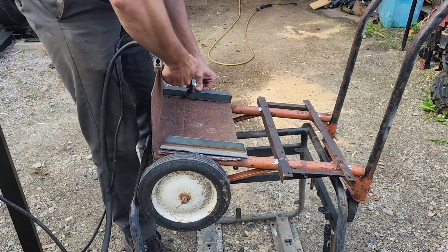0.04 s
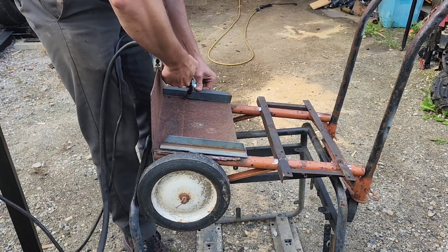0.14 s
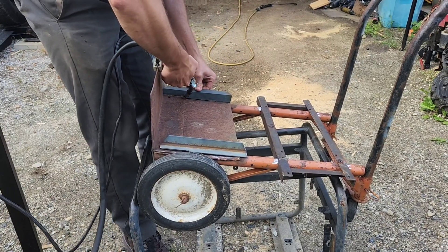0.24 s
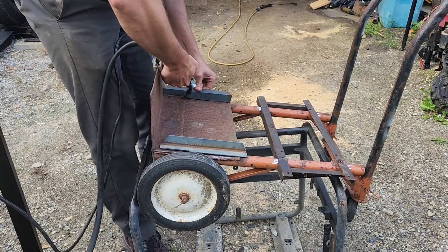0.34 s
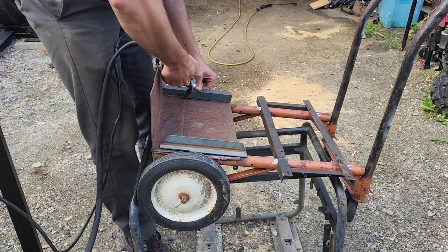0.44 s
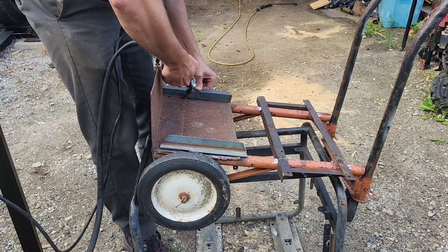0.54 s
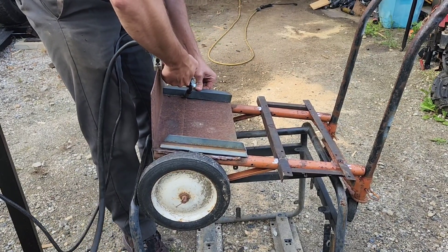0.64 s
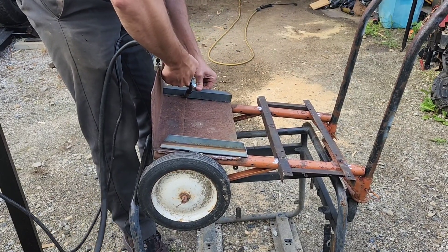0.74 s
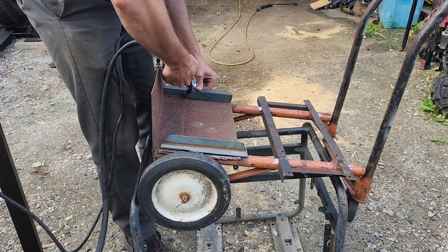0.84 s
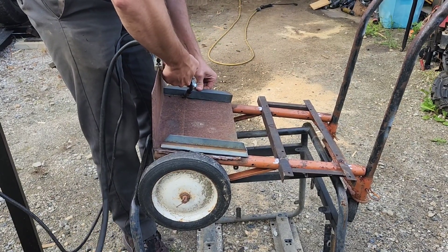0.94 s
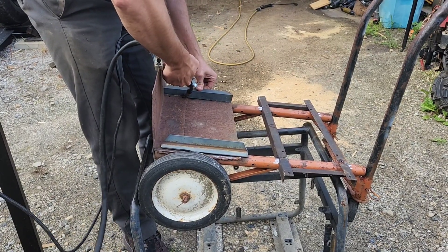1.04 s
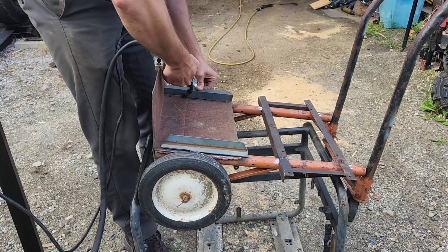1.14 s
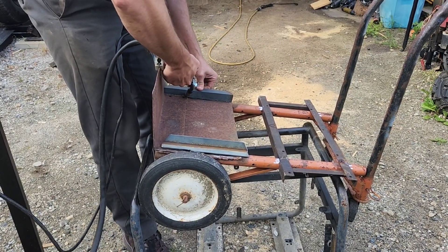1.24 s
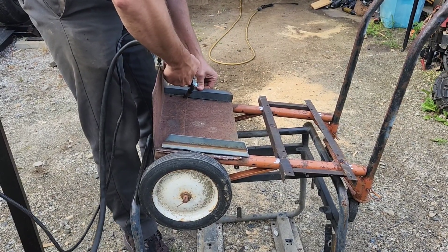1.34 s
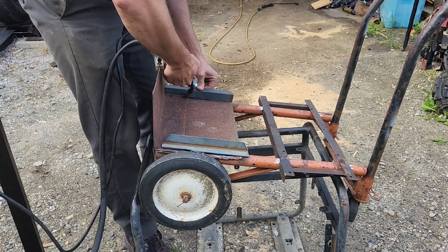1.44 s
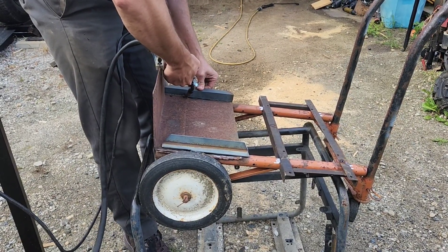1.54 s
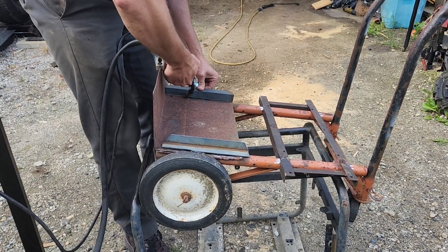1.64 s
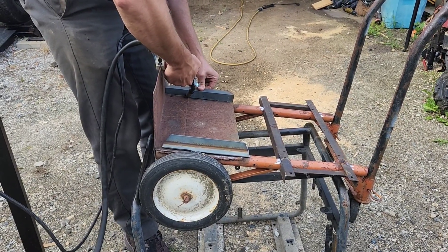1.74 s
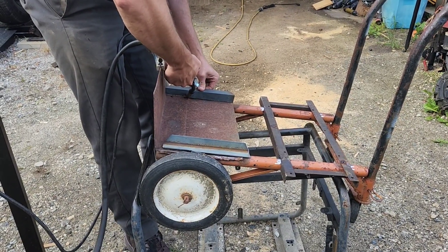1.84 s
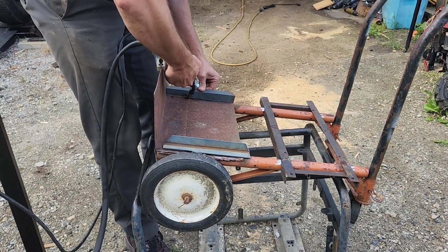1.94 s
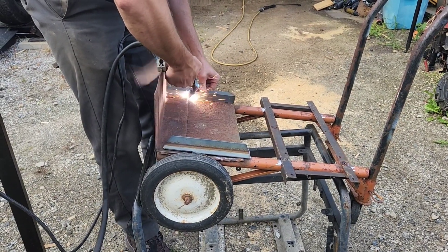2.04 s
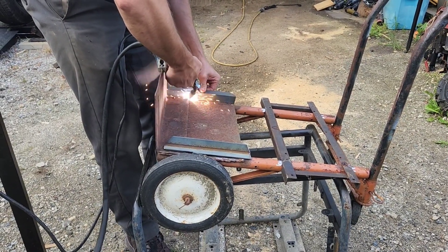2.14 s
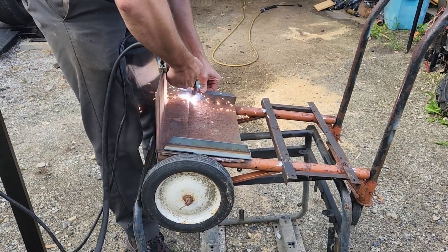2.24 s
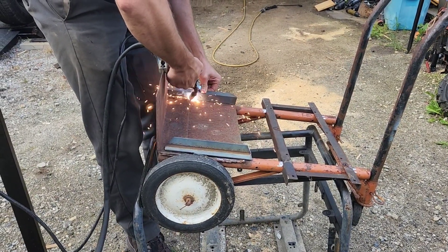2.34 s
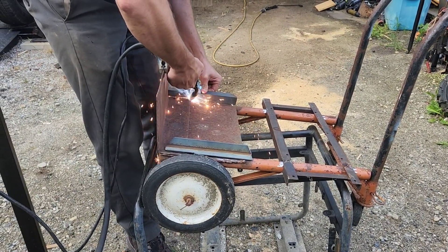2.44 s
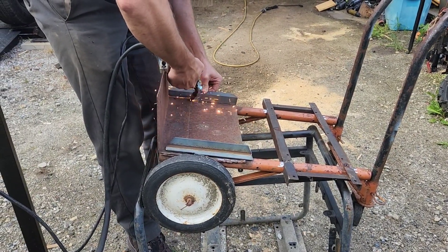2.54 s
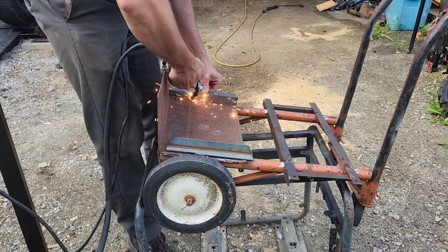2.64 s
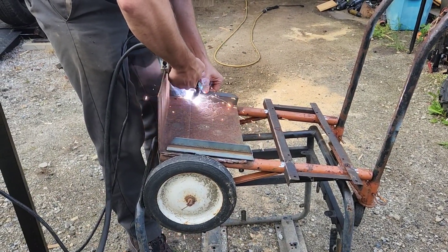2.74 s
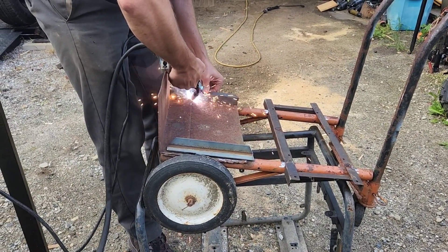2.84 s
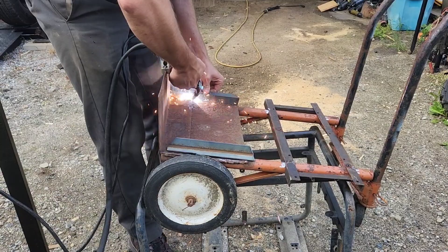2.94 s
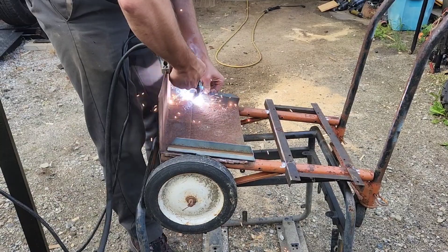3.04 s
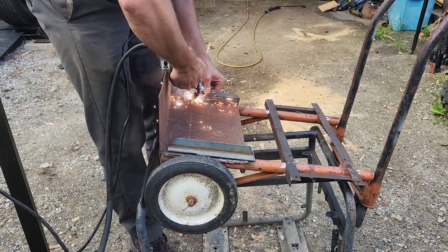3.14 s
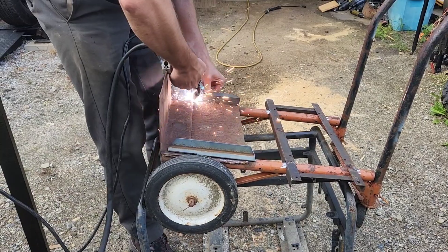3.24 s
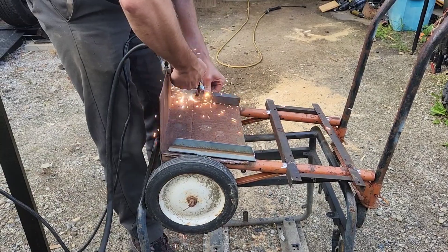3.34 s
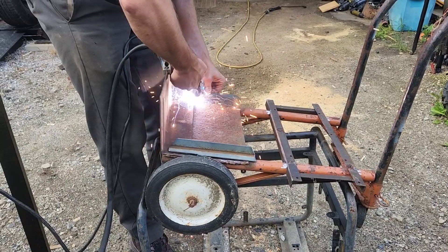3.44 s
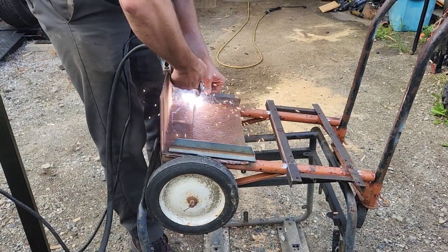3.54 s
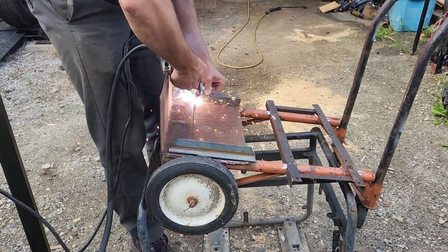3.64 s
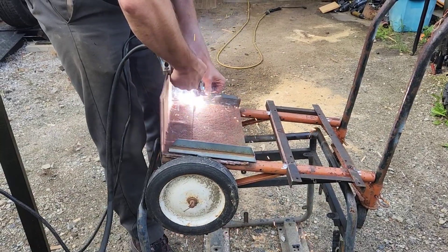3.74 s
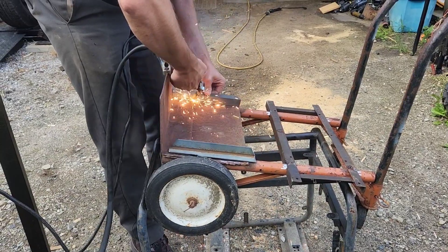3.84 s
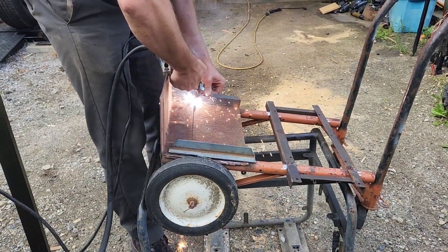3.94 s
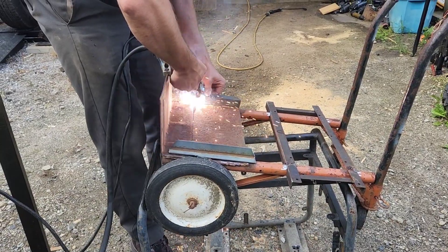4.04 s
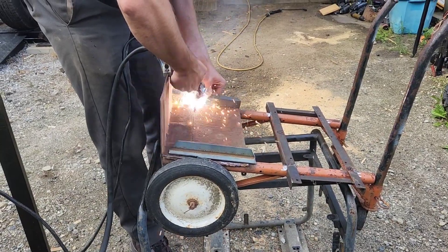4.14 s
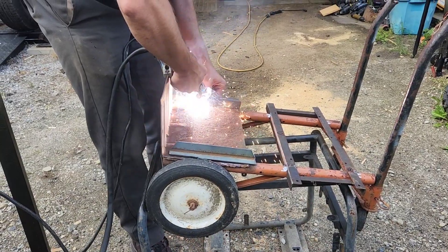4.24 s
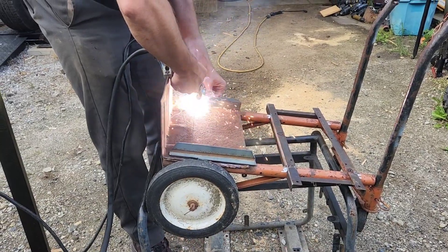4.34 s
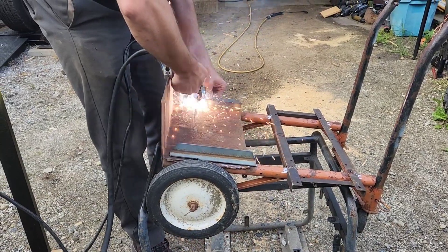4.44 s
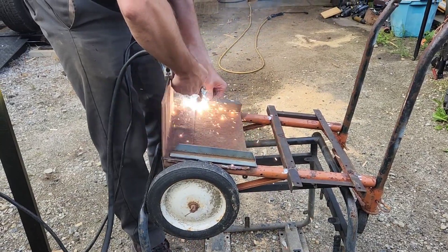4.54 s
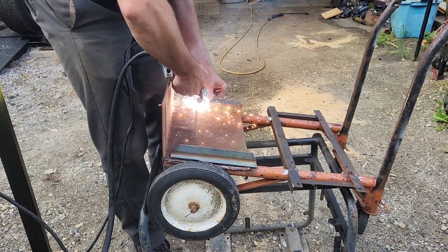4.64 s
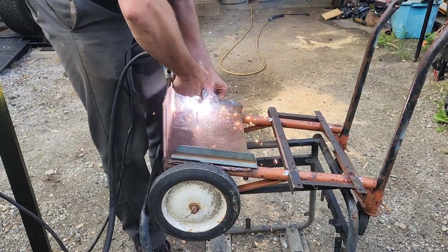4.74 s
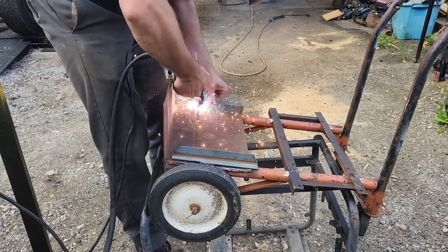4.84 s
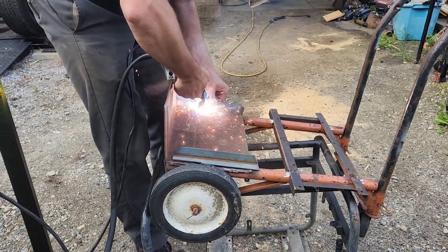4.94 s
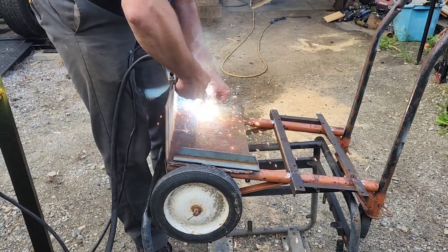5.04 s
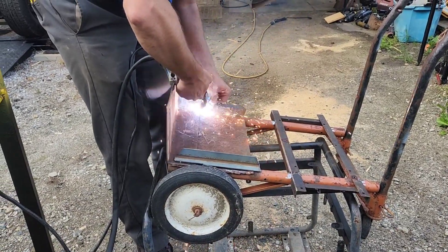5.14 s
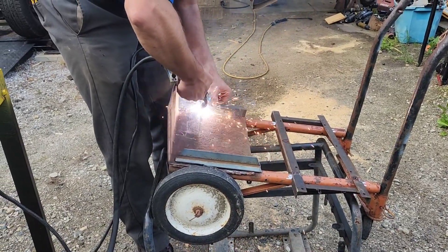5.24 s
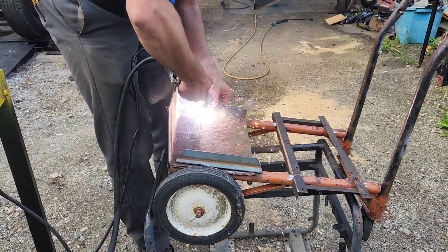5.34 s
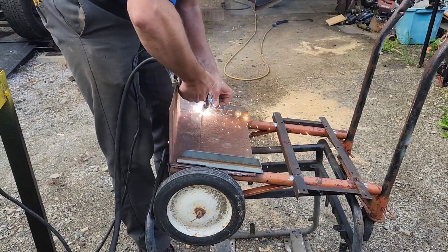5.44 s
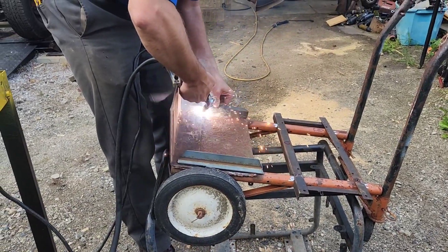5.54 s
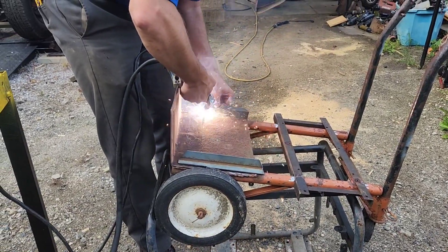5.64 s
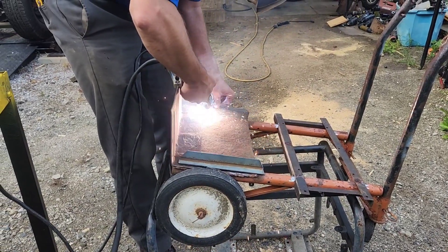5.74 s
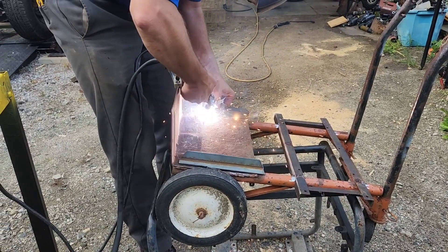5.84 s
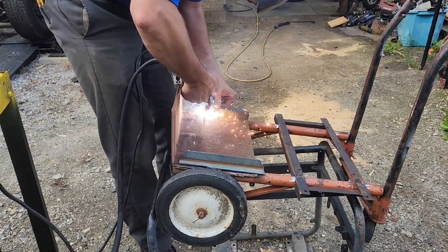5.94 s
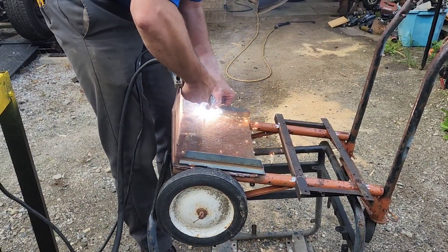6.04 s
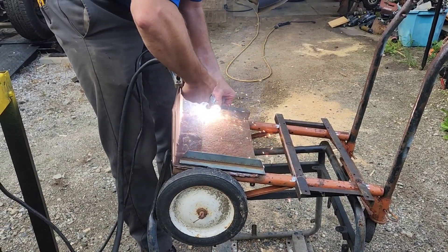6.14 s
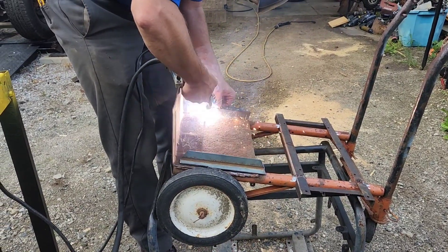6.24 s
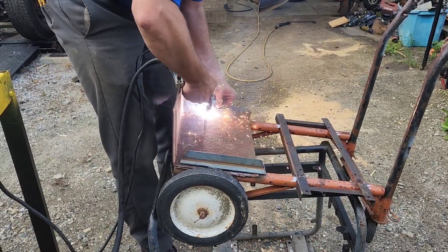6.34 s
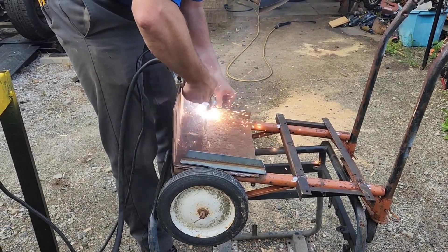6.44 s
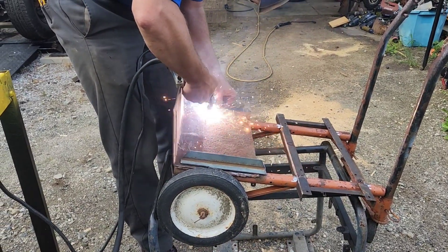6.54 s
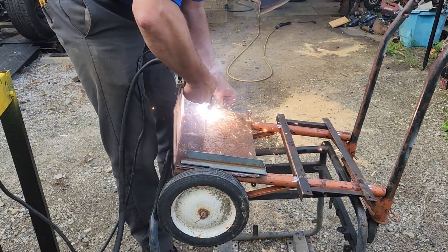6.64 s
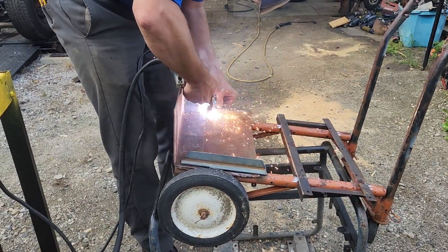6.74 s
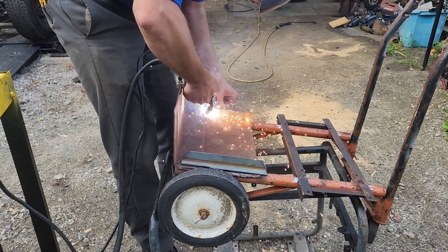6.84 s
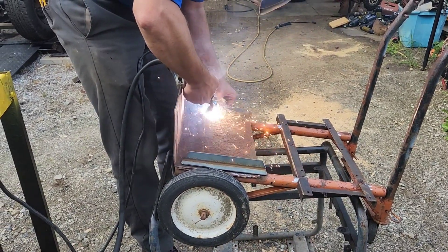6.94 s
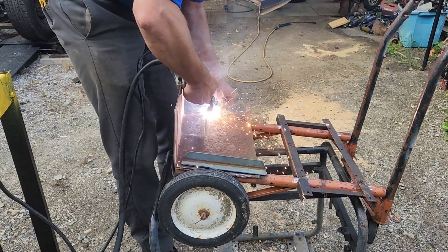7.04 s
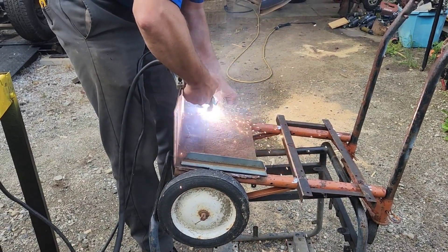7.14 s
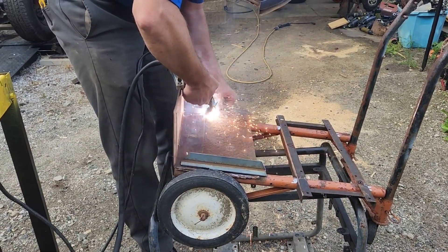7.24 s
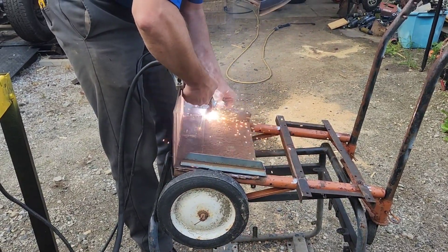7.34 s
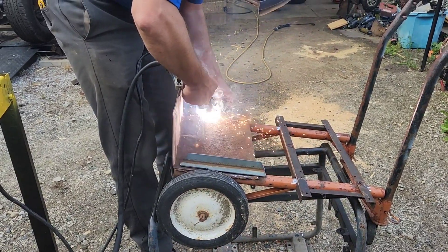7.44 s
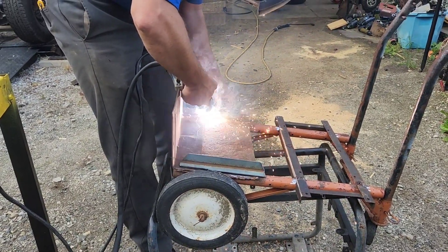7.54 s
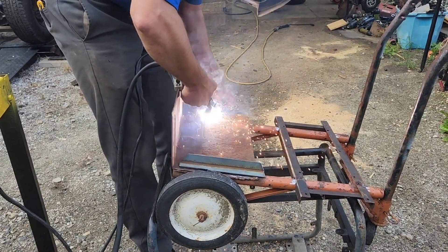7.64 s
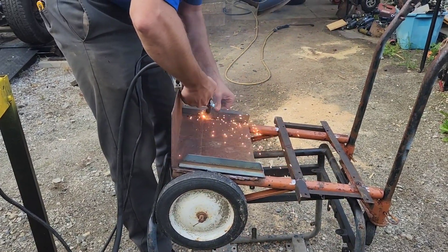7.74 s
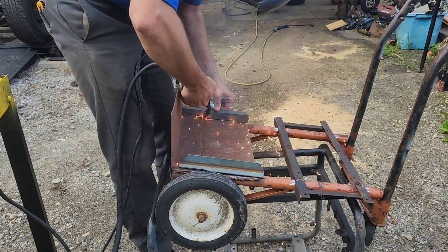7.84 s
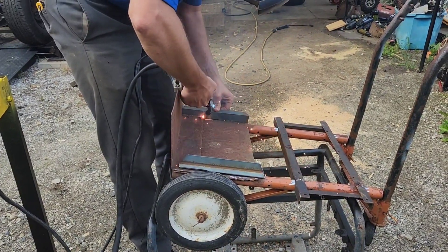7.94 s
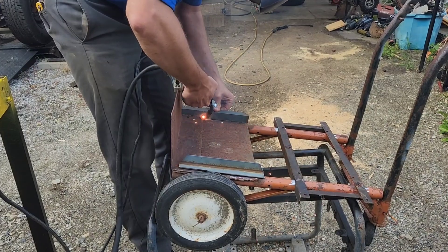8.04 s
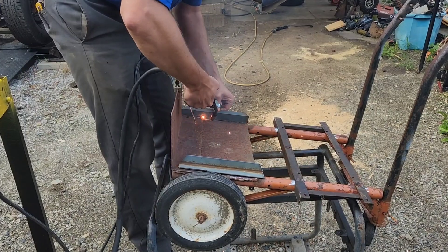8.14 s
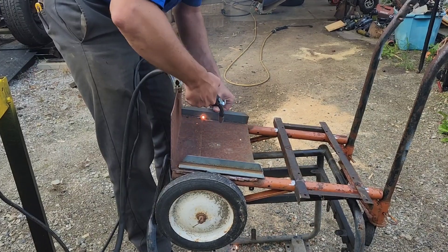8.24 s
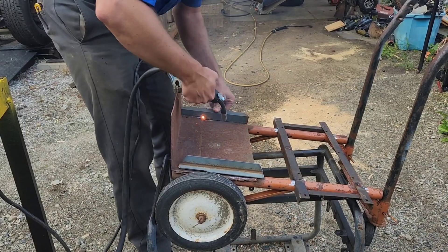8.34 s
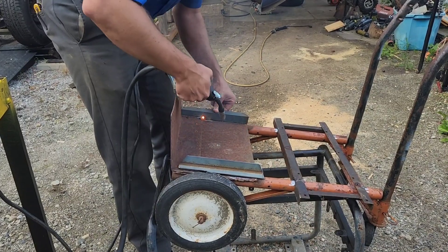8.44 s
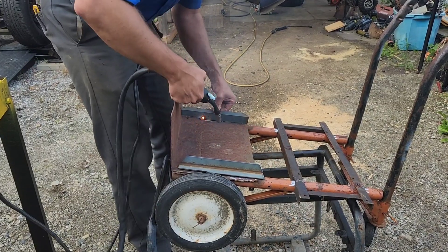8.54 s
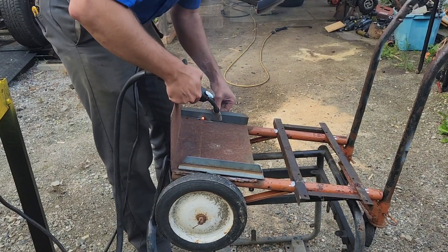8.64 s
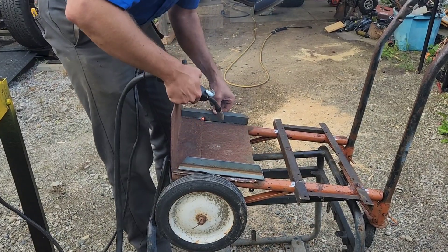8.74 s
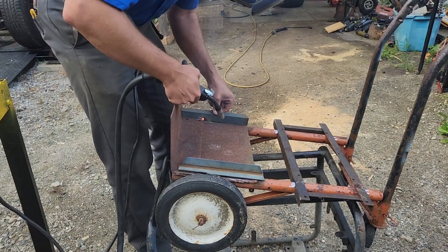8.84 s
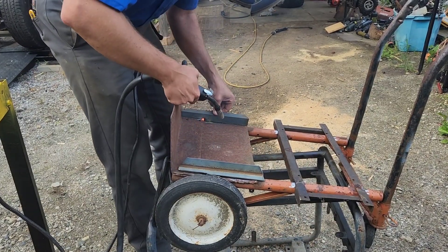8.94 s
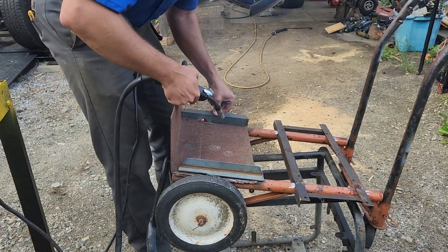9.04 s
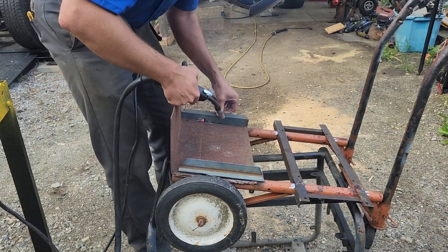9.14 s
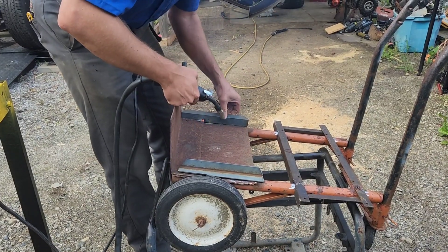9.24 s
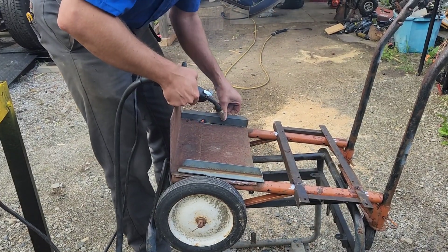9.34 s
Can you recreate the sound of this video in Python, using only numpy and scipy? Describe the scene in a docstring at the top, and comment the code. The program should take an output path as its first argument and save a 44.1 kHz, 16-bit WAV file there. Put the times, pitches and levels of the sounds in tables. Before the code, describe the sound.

Outside a workshop, a welder's cooling fan rushes steadily off to the left over a faint low drone. After about two seconds the torch ticks, its feed whines faintly, and the arc strikes with sharp pops. Dense hiss and irregular snapping settle into rapid pulsing bouts of frizzle, then cut off. The bead fizzes briefly, a small tick follows, and the fan remains. Close stereo phone pickup, dry and bright.

```python
"""A flux-core wire welder lays a short bead on a steel plate outside a workshop, a metre or so from a phone.
The arc hisses as dense random cracks; several times a second the wire dips into the pool and frizzles in a bout
of short circuits, and molten bridges burst with sharp pops. The plate thuds and rings, the yard answers. The
welder's fan (filtered noise and sine tones) runs throughout off to the left, over a low drone in the middle.
The torch ticks and its wire feed whines before the arc strikes; afterwards the bead fizzes as it cools."""
import sys
import numpy as np
from scipy import signal
from scipy.fft import rfft, irfft, next_fast_len
from scipy.io import wavfile
from scipy.ndimage import uniform_filter1d

SR = 44100
rng = np.random.default_rng(int(sys.argv[2]) if len(sys.argv) > 2 else 0)


def transcribe(u):
    """Save the signal u as a 16-bit wav file named by the first command-line argument.

    u: samples, shape (n,) or (channels, n), limited to [-1, 1]; the rate is SR.
    q: integer samples, one column per channel.
    """
    v = np.clip(np.atleast_2d(u).T, -1, 1)
    q = np.round(v * 32767).astype(np.int16)
    wavfile.write(sys.argv[1], SR, q)


N = 414116
TIME = np.arange(N) / SR
SIZE = 2 * next_fast_len(N // 2 + SR // 2)  # transform length, with room for filter tails
FREQ = np.arange(SIZE // 2 + 1) * SR / SIZE + 1e-6  # Hz, kept just above zero for the logarithm

# All levels in the tables are relative: the functions set the balance between layers.
# Air rushing through the welder, its spectrum at each side: pitch_hz, left_db, right_db
FAN_SPECTRUM = [(22, -32.0, -33.0), (60, -26.5, -27.5), (110, -29.5, -30.0), (180, -33.5, -36),
                (260, -27.0, -29.0), (410, -39.5, -39.5), (650, -37.5, -45.0), (1100, -38.5, -40.5),
                (1450, -37.5, -35), (2450, -44.5, -49), (3000, -42, -45), (4000, -46.5, -47),
                (5200, -48, -53), (5900, -46.5, -52.5), (6800, -56, -66), (9000, -66.5, -70.0),
                (15000, -73.5, -96.0)]
# Hollow resonances of the welder's case: pitch_hz, width_hz, peak_db
CASE_MODES = [(56.5, 19, 4), (334.2, 15, 12), (488.5, 35, 11.5), (783, 52, 11), (970, 32, 8),
              (2165, 160, 10.5), (2660, 56, 3), (4800, 400, 3.5), (6160, 230, 5)]
# The rush of air sinks slightly during the weld and recovers at the end: time_s, level_db
FAN_LEVEL = [(2, 0), (8, -2), (9.4, 0)]
# Whine of the fan: pitch_hz, left_db, right_db
FAN_TONES = [(574, -72, -56), (1153, -59, -57.5), (1303, -61.5, -73), (2296.8, -71.5, -60.5)]
# Low throbbing drone that fades unevenly: time_s, fundamental_db, octave_db
DRONE_LEVEL = [(0, -52.5, -57), (1.5, -55, -57), (3.5, -56.5, -56), (5, -53, -60.5), (6.2, -58.5, -66),
               (9.4, -62, -70.5)]
# Small ticks of the torch: start_s, level_db (energy spread over 3 ms), ring_peak_db
TORCH_TICKS = [(1.719, -40, 12), (8.081, -44.5, 5)]
# The hot bead fizzes as it cools: time_s, level_db
COOLING_FIZZ = [(7.7, -90), (7.76, -53), (7.85, -61), (8.1, -68), (8.3, -73), (8.7, -83), (9.4, -95)]
# The burning arc: time_s, hiss_level_db, treble_over_body_db, cracks_per_s (of the frizzle in a bout)
ARC_COURSE = [(2.07, -28.5, 5, 630), (2.5, -29, 1.5, 1300), (3.0, -25.5, 0, 540), (3.6, -29.5, 0.5, 310),
              (4.2, -28, 2, 1000), (4.7, -31, 4, 760), (5.0, -27.5, 2.5, 510), (5.55, -28, 4, 560),
              (6.2, -26, 4, 960), (7.0, -27, 4, 500), (7.6, -24, 0.5, 540), (7.75, -30.5, 5, 940)]
# The wire stubs on the plate and the hiss drops: start_s, end_s
WIRE_STUBS = [(2.242, 2.26), (2.575, 2.618), (2.634, 2.657), (2.70, 2.732), (2.762, 2.785), (3.092, 3.11),
              (3.218, 3.259), (3.378, 3.418), (3.545, 3.564), (3.592, 3.616), (3.90, 3.934), (5.43, 5.473),
              (5.492, 5.542), (5.962, 5.99)]
# The wire dips into the pool and frizzles: start_s, end_s, body_db, treble_db
POOL_DIPS = [(2.081, 2.103, -18, -19), (2.338, 2.375, -24, -21), (2.807, 2.873, -28, -25.5),
             (2.935, 2.994, -28.5, -26), (3.031, 3.08, -28, -22.5), (3.109, 3.135, -26, -26),
             (3.434, 3.464, -26.5, -21.5), (3.636, 3.651, -30, -15.5), (3.84, 3.892, -28.5, -26),
             (4.015, 4.069, -23.5, -21), (4.124, 4.194, -22.5, -21), (4.255, 4.327, -26.5, -20),
             (4.385, 4.444, -20.5, -16), (4.513, 4.586, -25, -19.5), (4.651, 4.709, -23, -20),
             (4.786, 4.864, -26.5, -20.5), (4.873, 4.897, -21, -18.5), (4.932, 4.982, -25.5, -22),
             (4.998, 5.109, -24, -21.5), (5.209, 5.281, -24, -21.5), (5.327, 5.346, -27.5, -26),
             (5.398, 5.415, -21, -17), (5.65, 5.714, -26.5, -21.5), (5.779, 5.841, -23.5, -20),
             (5.902, 5.958, -25.5, -23), (6.037, 6.087, -24.5, -19.0), (6.168, 6.235, -27, -21),
             (6.298, 6.359, -21, -19.5), (6.428, 6.494, -24.5, -19.5), (6.555, 6.617, -22, -19),
             (6.651, 6.747, -21, -20.5), (6.799, 6.873, -25.5, -21.5), (6.933, 6.993, -21.5, -20),
             (7.07, 7.119, -25, -21), (7.17, 7.248, -25.5, -19.5), (7.304, 7.361, -28.5, -19),
             (7.424, 7.515, -23.5, -20.5), (7.551, 7.629, -25.5, -22), (7.686, 7.724, -25, -18)]
# A molten bridge blows apart: start_s, body_db, treble_db (energy spread over 3 ms)
BRIDGE_POPS = [(2.075, -12.5, -13.5), (2.107, -12.5, -16.0), (2.12, -20.5, -12), (2.199, -26, -11),
               (2.236, -23, -16.5), (2.261, -18.5, -18), (2.278, -14.5, -16), (2.316, -15, -14.5),
               (2.346, -20.5, -20.5), (2.352, -27, -23), (2.367, -21, -15.5), (2.491, -22.5, -19.5),
               (2.508, -28.5, -23.5), (2.554, -15.5, -16.0), (2.562, -15, -10.5), (2.62, -9, -17.0),
               (2.627, -21, -13), (2.659, -17, -11.5), (2.673, -12.5, -6), (2.685, -8, -13),
               (2.734, -15, -13.5), (2.747, -16, -8.5), (2.786, -22.5, -13.5), (2.797, -15.0, -14),
               (2.814, -18.0, -20), (2.828, -23.0, -19.5), (2.844, -33.5, -34.5), (2.902, -19, -10.5),
               (2.916, -30, -24), (2.928, -22.5, -14), (2.941, -30.5, -23), (2.978, -31.0, -25),
               (2.985, -25, -19), (3, -16.5, -14.5), (3.024, -40.5, -24), (3.049, -26.5, -18),
               (3.067, -29.5, -15.5), (3.113, -30.0, -14.5), (3.118, -19.5, -16.5), (3.123, -25, -23),
               (3.146, -15.5, -11), (3.176, -14, -13.5), (3.186, -22, -13.5), (3.26, -16.0, -7.5),
               (3.268, -19.5, -13.0), (3.281, -24, -12), (3.298, -22, -14), (3.303, -26, -16.5),
               (3.312, -27, -14.5), (3.327, -19, -10), (3.358, -32.5, -24.0), (3.371, -21.5, -13),
               (3.42, -15, -14.5), (3.428, -15.5, -17), (3.441, -12.5, -17.5), (3.455, -22, -10.5),
               (3.463, -31, -15), (3.473, -18, -10), (3.492, -18.5, -15.5), (3.516, -11.5, -14),
               (3.528, -10, -13.5), (3.535, -20, -25), (3.564, -12, -13), (3.585, -17.5, -17.5),
               (3.618, -13.5, -10.5), (3.64, -17, -21.0), (3.647, -12, -23), (3.703, -16.5, -10),
               (3.727, -24, -14), (3.739, -23, -11.5), (3.766, -41, -21), (3.779, -27, -11.5),
               (3.815, -16.5, -16.5), (3.854, -20, -18), (3.868, -17.5, -17.5), (3.889, -22.5, -17),
               (3.935, -15, -11.5), (3.977, -30.5, -22.5), (4.02, -28, -24), (4.027, -36, -21),
               (4.034, -11.5, -12), (4.138, -13.5, -13), (4.148, -12.5, -9), (4.162, -25, -26),
               (4.191, -17.5, -15.5), (4.396, -23.5, -17.0), (4.428, -20, -17), (4.454, -21.5, -16.5),
               (4.682, -16.5, -16), (4.795, -15.5, -13.5), (4.829, -24, -17.5), (4.903, -19.0, -20),
               (4.922, -20, -12), (5.01, -16, -16.0), (5.015, -14, -19.5), (5.093, -24, -18.0),
               (5.124, -17, -15.5), (5.137, -14, -11), (5.164, -21, -17.5), (5.302, -21.5, -13.5),
               (5.319, -11, -13), (5.362, -13, -16), (5.417, -16, -16.0), (5.474, -16, -17),
               (5.485, -14.5, -12), (5.523, -27, -25.5), (5.544, -19, -14.5), (5.558, -20, -15.5),
               (5.566, -20, -14.5), (5.579, -30.5, -26), (5.695, -19, -10.5), (5.815, -17, -9),
               (5.93, -19, -11), (5.943, -23, -19), (5.991, -20.5, -18), (6.002, -17.5, -12.5),
               (6.037, -14.5, -15), (6.043, -16, -14), (6.112, -16.5, -15.0), (6.122, -20.5, -15.5),
               (6.183, -18, -11), (6.2, -18.0, -14.5), (6.316, -18, -12.5), (6.323, -20.0, -14.5),
               (6.34, -19, -14.5), (6.43, -14.5, -11.5), (6.583, -13, -13.5), (6.659, -26, -17),
               (6.671, -23.5, -13.5), (6.825, -22, -18), (6.843, -22.5, -11.5), (6.926, -15.5, -13.5),
               (6.947, -28, -13.0), (6.986, -21.5, -15.5), (7.011, -15, -14), (7.039, -18.5, -21),
               (7.111, -18.0, -22), (7.213, -12, -15), (7.33, -19, -13), (7.354, -18, -17.5),
               (7.405, -26, -14.5), (7.426, -25, -16), (7.674, -22.5, -10), (7.745, -25.0, -22.5)]
# Colour of the arc's cracks at each side: pitch_hz, left_db, right_db
CRACK_SPECTRUM = [(110.6, -17, -19), (227, -27, -31.5), (410, -5.5, -10), (488, -17, -19.5),
                  (835, -3.5, -5), (1480, -2, -1.5), (1500, -22, -13), (1550, -1, -1.5), (2340, -0.5, 0),
                  (2950, 5.5, -0.5), (3000, -7.5, 4.5), (4040, 8.5, 0), (6000, -4.5, -4.5),
                  (8200, -3, -3.5), (8980, -5.5, -6), (10180, -2, -11.5), (10650, -5, -17),
                  (11800, -0.5, -7), (14630, 1, -8.5), (15700, 0.5, -20)]
# Hollow between the crackle and the fizz: pitch_hz, width_hz, depth_db
CRACK_HOLLOW = [(3320, 290, 12.5)]
# The steel answers differently as the torch travels along it: time_s, thud_db, ring_db
PLATE_ANSWER = [(2.1, -25, -22), (2.7, -22, -9), (4.2, -22.5, -24), (5.2, -25, -9.5), (6.2, -25.5, -2.5),
                (7.7, -28, -4)]
# Resonances of the left, then the right microphone port: pitch_hz, width_hz, peak_db
MIC_PORTS = [
    [(5450, 760, 2.5), (7550, 580, 6.5), (12340, 1160, 3.5)],
    [(2477, 143, 18), (4566, 447, 8.5), (5110, 186, 10), (11900, 730, 4)],
]

DRONE_HZ = 76.9
TICK_RING_HZ, TICK_RING_WIDTH_HZ = 4950, 600
ARC_ON_S, ARC_OFF_S = 2.072, 7.755
ARC_LAG_MS = 0.14  # the arc reaches the right port this much later
DIP_EDGE_S = 0.0051  # half the length of each edge of a bout
FRIZZLE_BODY_DB, FRIZZLE_TREBLE_DB = 1, -3  # fine frizzle between the short circuits, against the dip
SHORT_HZ, SHORT_JITTER = 189.7, .45  # inverse of the median spacing; log spread before clipping
SHORT_BODY_DB, SHORT_TREBLE_DB = -1, 2  # short circuits against the dip
SHORT_SPREAD_DB, SHORT_COLOUR_DB = 2.8, 1.3  # chance in their size and brightness, before clipping
BRIDGED_S = 0.0034  # no small short circuit fires this soon before a big pop
POP_DECAY_MS, POP_SCATTER_DB, POP_SCATTER_MS = .5, -7, 1.4
BODY_TOP_HZ, TREBLE_FROM_HZ = 3000, 4930  # a crack has a dull body and a bright treble
TOP_HZ = 15600


def undb(db):
    """Decibels to gain."""
    return 10 ** (np.asarray(db) / 20)


def curve(rows, axis=1):
    """One column of a table, joined by straight lines in time."""
    rows = np.array(rows)
    return np.interp(TIME, rows[:, 0], rows[:, axis])


def walk(rate):
    """Slow random wandering with a spread near 1: held random steps, smoothed."""
    k = int(SR / rate)
    steps = np.repeat(rng.standard_normal(N // k + 1), k)[:N]
    return 1.297 * uniform_filter1d(steps, k)


def gate(start, end, edge):
    """One between two times, with straight edges that reach `edge` seconds either side of them."""
    corners = [start - edge, start + edge, max(end - edge, start + edge), end + edge]
    return np.interp(TIME, corners, [0, 1, 1, 0])


def shape(x, db):
    """Causal minimum-phase filter with the given gain in dB at every frequency."""
    cepstrum = irfft(np.log(undb(db)), SIZE)
    cepstrum[..., 1:SIZE // 2] *= 2  # fold the later half onto the earlier one
    cepstrum[..., SIZE // 2 + 1:] = 0
    return irfft(rfft(x, SIZE) * np.exp(rfft(cepstrum)), SIZE)[..., :N]


def colour(x, table):
    """Give a sound its left and right spectrum."""
    hz, *sides = np.transpose(table)
    gains_db = np.array([np.interp(np.log(FREQ), np.log(hz), db) for db in sides])
    return shape(x, gains_db)


def resonances(modes):
    """Gain in dB of a few resonant peaks."""
    total_db = 0
    for hz, width, db in modes:
        detuning = (FREQ ** 2 - hz ** 2) / (FREQ * width)
        total_db = total_db + 10 * np.log10(1 + (undb(db) ** 2 - 1) / (1 + detuning ** 2))
    return total_db


def band(x, lo_hz, hi_hz):
    """Gentle band-pass."""
    edges = [lo_hz, min(hi_hz, SR / 2 - 1)]
    return signal.sosfilt(signal.butter(2, edges, "band", fs=SR, output="sos"), x)


def delay(x, ms):
    """The same sound a little later, by a phase slope that allows parts of a sample."""
    return irfft(rfft(x, SIZE) * np.exp(-2j * np.pi * FREQ * ms / 1000), SIZE)[:N]


def from_left(x, lag_ms):
    """A source to the left reaches the right port later."""
    return np.array([x, delay(x, lag_ms)])


def fan_rush():
    """Cooling air as gusting noise from the left plus wide noise, ringing in the welder's case."""
    air = from_left(rng.standard_normal(N) * undb(0.59 * walk(8.3)), lag_ms=0.37)
    spread = band(rng.standard_normal((2, N)), 780, 16000)
    floor = rng.standard_normal((2, N))
    rush = colour(undb(-1.5) * air + undb(-3.5) * spread + undb(-29.5) * floor, FAN_SPECTRUM)
    return shape(rush, resonances(CASE_MODES)) * undb(curve(FAN_LEVEL))


def fan_whine():
    """Sine tones share one slightly wavering fan speed, each wandering in level."""
    fan_clock = np.cumsum(1 + 0.001057 * walk(4)) / SR
    whine = 0
    for hz, left_db, right_db in FAN_TONES:
        tone = from_left(np.sin(2 * np.pi * hz * fan_clock), lag_ms=0.27)
        whine = whine + undb(np.array([[left_db], [right_db]]) + 2.3 * walk(8.8)) * tone
    return whine


def low_drone():
    """A wavering low tone and its octave, each throbbing at random."""
    turn = 2 * np.pi * np.cumsum(DRONE_HZ * (1 + 0.004 * walk(20))) / SR
    fundamental = undb(curve(DRONE_LEVEL) + 3.9 * walk(14)) * np.sin(turn)
    octave = undb(curve(DRONE_LEVEL, axis=2) + 1.06 * walk(7.6)) * np.sin(2 * turn)
    return fundamental + octave


def welder():
    """Cooling air and fan tones off to the left, over a low drone centred between the ports."""
    return fan_rush() + np.sqrt(2) * (fan_whine() + low_drone())


def bursts(energy, decay_ms):
    """Every impulse of energy becomes its own short decaying burst of noise."""
    keep = np.exp(-1000 / (decay_ms * SR))
    power = signal.lfilter([1 - keep], [1, -keep], energy + 1e-18)
    return np.sqrt(power) * rng.standard_normal(N)


def impulses(times, db):
    """Energy impulses, each worth the given level held for 3 ms."""
    return np.bincount((np.asarray(times) * SR).astype(int), undb(db) ** 2 * .003 * SR, N)


def cracks(rate, spread_db):
    """Energy impulses of random tiny cracks of unequal size, with a mean power near 1."""
    size = undb(spread_db * np.clip(rng.standard_normal(N), -2, 2)) ** 2
    energy = (rng.random(N) < rate / SR) * size
    # the wire feeds evenly, so the energy spent over any short stretch stays much the same
    return energy / (uniform_filter1d(energy, size=1400) + 0.073 * energy.mean())


def tick(time, db, ring_db):
    """A small snap with a brief ring and a faint rattle."""
    energy = impulses([time], [db])
    rattle = undb(-10) * bursts(energy, decay_ms=10)
    snap = band(bursts(energy, decay_ms=2.2) + rattle, 4100, 10600)
    return shape(snap, resonances([(TICK_RING_HZ, TICK_RING_WIDTH_HZ, ring_db)]))


def wire_feed():
    """Narrow-band noise whines until the arc strikes."""
    return undb(-49.0) * band(rng.standard_normal(N), 9950, 10060) * gate(1.74, ARC_ON_S, edge=.015)


def cooling_bead():
    """Bright tiny cracks fizz unevenly and die away as the bead cools."""
    fizz = bursts(cracks(rate=900, spread_db=5), decay_ms=.6)
    return band(fizz, 9000, 14800) * undb(curve(COOLING_FIZZ) + 3 + 2 * walk(16))


def torch():
    """Ticks of the trigger, whine of the wire feed and fizz of the bead, all louder on the left."""
    ticks = sum(tick(*row) for row in TORCH_TICKS)
    return from_left(ticks + wire_feed() + cooling_bead(), lag_ms=0.13) * undb([[0], [-8]])


def dipping():
    """Strength of the frizzle's body and treble: every dip starts abruptly, holds and stops."""
    effort = 0
    for start, end, body_db, treble_db in POOL_DIPS:
        effort = effort + undb([[body_db], [treble_db]]) * gate(start, end, edge=DIP_EDGE_S)
    return effort


def radiate(energy, decay_ms, scatter_db, scatter_ms):
    """Cracks arrive straight from the arc, then scattered by frame and ground, partly apart at each port."""
    scattered = band(bursts(energy, scatter_ms), 100.6, 7000)
    shared = bursts(energy, decay_ms) + undb(scatter_db) * scattered
    apart = band(np.array([bursts(energy, scatter_ms), bursts(energy, scatter_ms)]), 2200, 16600)
    return from_left(shared, ARC_LAG_MS) + undb(scatter_db + 4.5) * apart


def join(body, treble):
    """The low part of one sound with the high part of another."""
    low = signal.butter(6, BODY_TOP_HZ, fs=SR, output="sos")
    high = signal.butter(6, TREBLE_FROM_HZ, "high", fs=SR, output="sos")
    return signal.sosfilt(low, body) + signal.sosfilt(high, treble)


def sizzle(effort):
    """Fine hiss while the arc burns, hushed at each stub, and coarse frizzling in the dips."""
    stubbed = sum(gate(start, end, edge=0.0021) for start, end in WIRE_STUBS)
    hiss = cracks(rate=2400, spread_db=6.5) * undb(curve(ARC_COURSE) - 7.1 * stubbed) ** 2
    # as a factor on energy, half the tilt lifts the treble and half lowers the body
    tilt = undb(curve(ARC_COURSE, axis=2) + 5.4 * walk(40))
    frizzle = cracks(rate=curve(ARC_COURSE, axis=3), spread_db=1.5)
    burning = gate(ARC_ON_S, ARC_OFF_S, edge=0.008)
    body = hiss / tilt + frizzle * (undb(FRIZZLE_BODY_DB) * effort[0]) ** 2
    treble = hiss * tilt + frizzle * (undb(FRIZZLE_TREBLE_DB) * effort[1]) ** 2
    parts = [radiate(energy * burning, decay_ms=0.352, scatter_db=-10.5, scatter_ms=1.0)
             for energy in (body, treble)]
    return join(*parts)


def bridged(times):
    """True while a big molten bridge shorts the arc, in the last moments before it pops."""
    blows = np.append(np.sort(np.array(BRIDGE_POPS)[:, 0]), np.inf)
    return blows[np.searchsorted(blows, times)] - times < BRIDGED_S


def bridges(effort):
    """Rows start_s, body_db, treble_db: big pops, and an uneven stream of short circuits in the dips."""
    spacing, size, tint = np.clip(rng.standard_normal((1600, 3)), -1.6, 1.6).T
    shorts = ARC_ON_S + np.cumsum(np.exp(SHORT_JITTER * spacing)) / SHORT_HZ
    body, treble = (np.interp(shorts, TIME, strength) * ~bridged(shorts) for strength in effort)
    size_db, tint_db = SHORT_SPREAD_DB * size, SHORT_COLOUR_DB * tint
    body_db = 20 * np.log10(body + 1e-9) + SHORT_BODY_DB + size_db - tint_db
    treble_db = 20 * np.log10(treble + 1e-9) + SHORT_TREBLE_DB + size_db + tint_db
    small = np.transpose([shorts, body_db, treble_db])[body > 0]
    return np.vstack([BRIDGE_POPS, small])


def blast(times, db, shock_db, spray_db):
    """A bursting bridge sends out one shock and a brief spray of noise."""
    energy = impulses(times, db)
    spread = np.abs(uniform_filter1d(energy, size=36))
    spray = radiate(spread, POP_DECAY_MS, POP_SCATTER_DB, POP_SCATTER_MS)
    return undb(shock_db) * from_left(np.sqrt(energy), ARC_LAG_MS) + undb(spray_db) * spray


def pops(effort):
    """Each exploding bridge of metal is one sharp snap, dull or bright."""
    times, body_db, treble_db = bridges(effort).T
    body = blast(times, body_db, shock_db=2.0, spray_db=2.0)
    treble = blast(times, treble_db, shock_db=-4.0, spray_db=2.0)
    return join(body, treble)


def plate(arc):
    """The arc's power drives noise in two bands of the steel: a low thud and a longer, narrow ring."""
    power = np.mean(arc ** 2, axis=0)
    thud = band(bursts(power, decay_ms=0.76), 218.0, 437) * undb(curve(PLATE_ANSWER) + 14.5)
    ring = band(bursts(power, decay_ms=2.7), 1971, 2065) * undb(curve(PLATE_ANSWER, axis=2) + 7)
    return from_left(thud + ring, lag_ms=0.05)


def echoes(x, start_ms, t60_s):
    """Diffuse reflections as decaying noise, different at the two ports."""
    t = np.arange(SR) / SR
    tail = rng.standard_normal((2, SR)) * undb(-60 * t / t60_s) * (t > start_ms / 1000)
    tail /= np.sqrt(np.sum(tail ** 2, axis=1, keepdims=True))
    return signal.fftconvolve(x[None], tail, axes=1)[:, :N]


def weld():
    """The arc, the thud and ring of the plate, and the faint return of the yard."""
    effort = dipping()
    arc = sizzle(effort) + pops(effort)
    yard = undb(-14) * echoes(arc[0], start_ms=4.9, t60_s=0.039)
    crackle = shape(colour(arc + yard, CRACK_SPECTRUM), -resonances(CRACK_HOLLOW))
    return undb(-0.5) * crackle + plate(arc)


def scene():
    """Everything passes the resonant microphone ports."""
    ports_db = np.array([resonances(port) for port in MIC_PORTS])
    return shape(welder() + torch() + weld(), ports_db)


def record(dry):
    """The phone rounds the tallest peaks and cuts the top."""
    rounded = 1.1 * np.tanh(dry / 1.1)
    return signal.sosfilt(signal.ellip(8, .2, 70, TOP_HZ, fs=SR, output="sos"), rounded)


dry = scene()
out = record(dry)
transcribe(out)
```